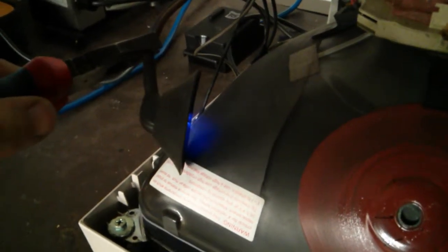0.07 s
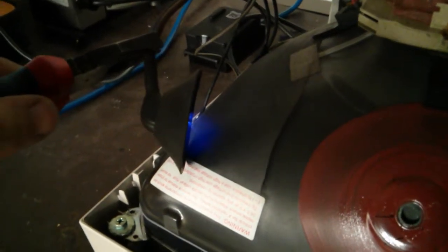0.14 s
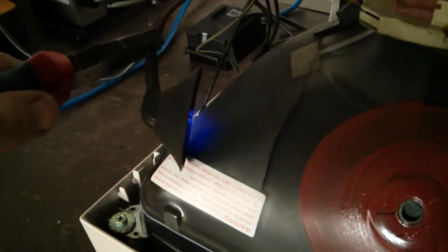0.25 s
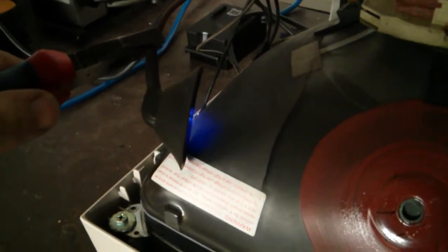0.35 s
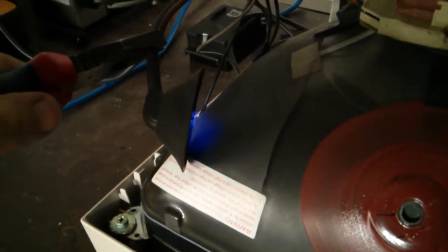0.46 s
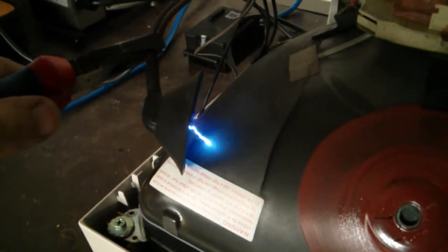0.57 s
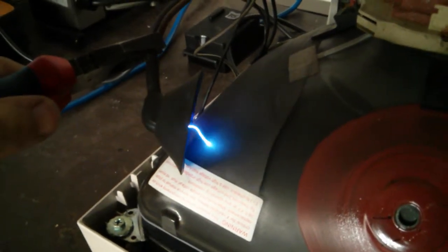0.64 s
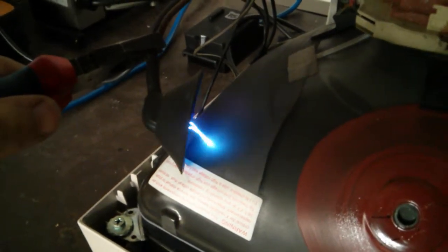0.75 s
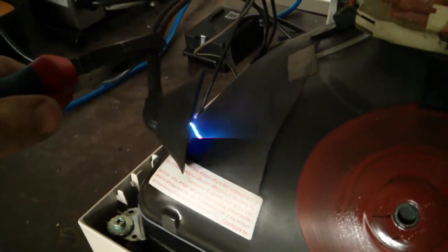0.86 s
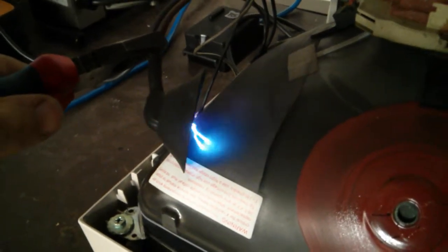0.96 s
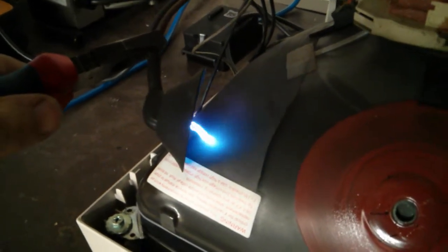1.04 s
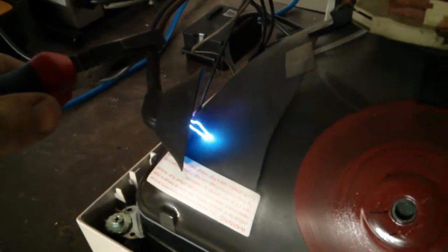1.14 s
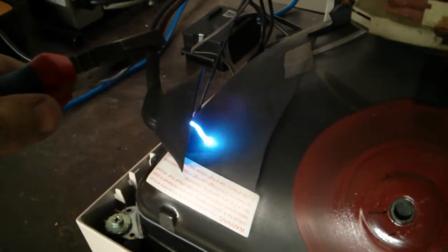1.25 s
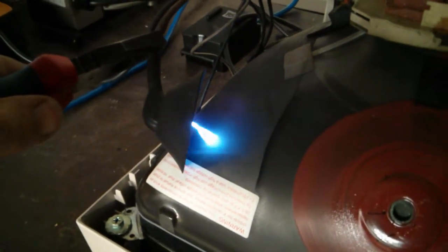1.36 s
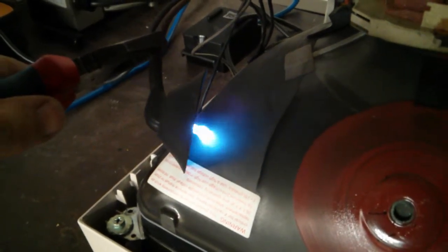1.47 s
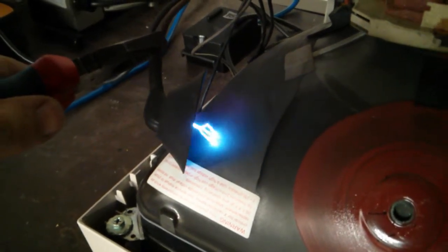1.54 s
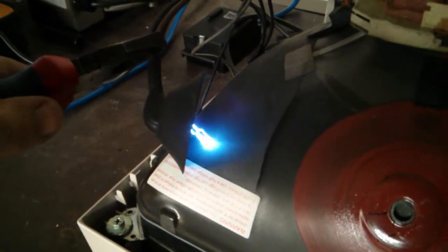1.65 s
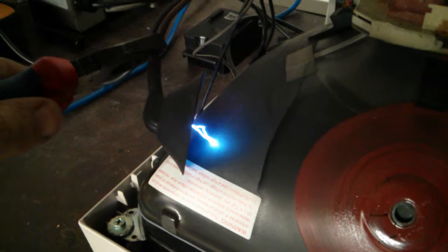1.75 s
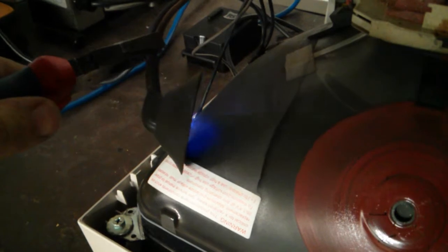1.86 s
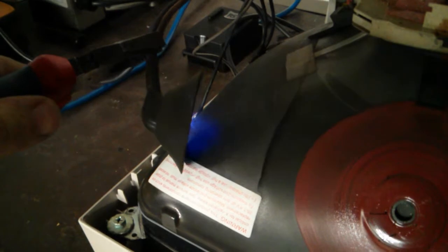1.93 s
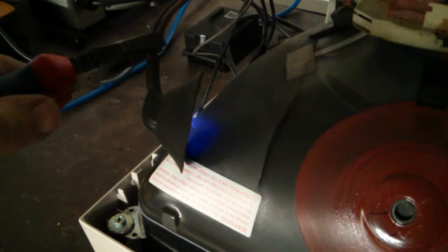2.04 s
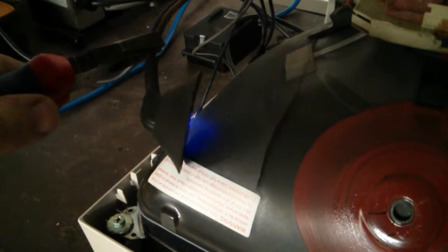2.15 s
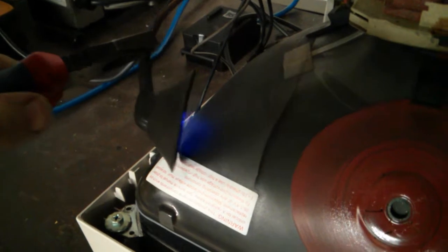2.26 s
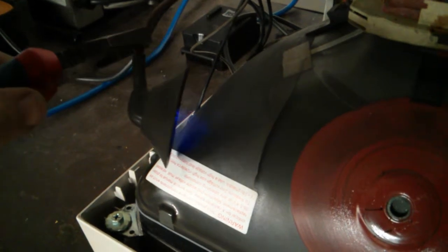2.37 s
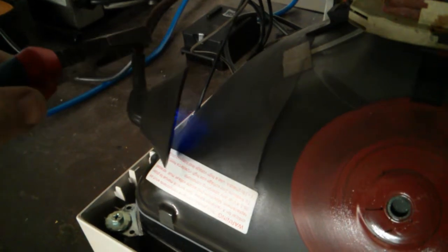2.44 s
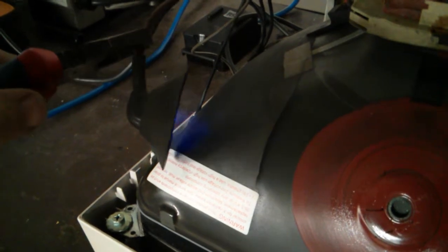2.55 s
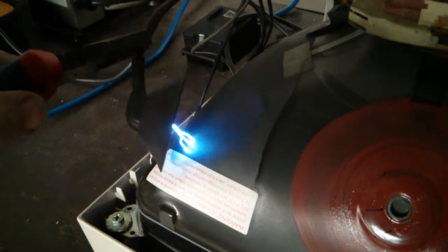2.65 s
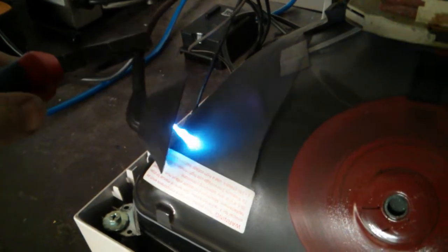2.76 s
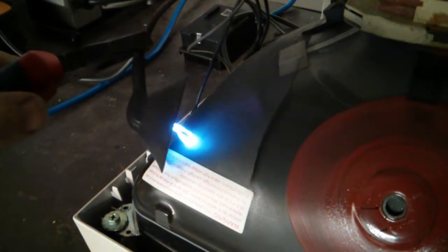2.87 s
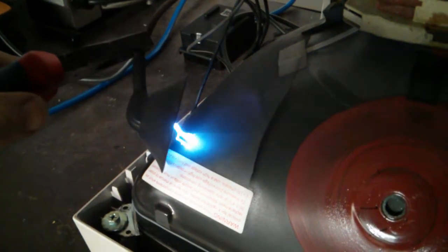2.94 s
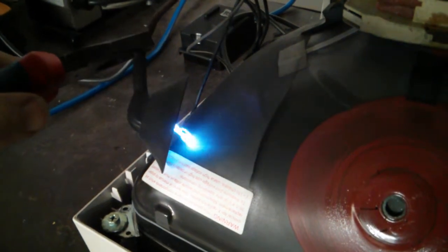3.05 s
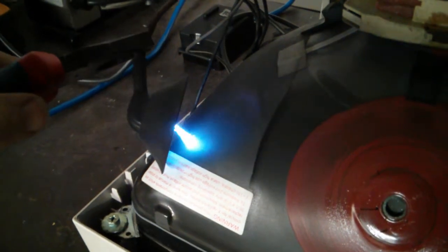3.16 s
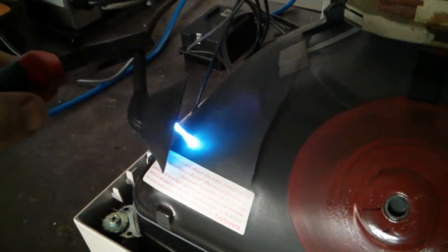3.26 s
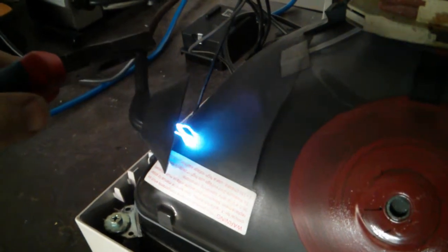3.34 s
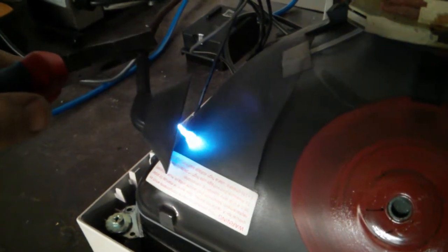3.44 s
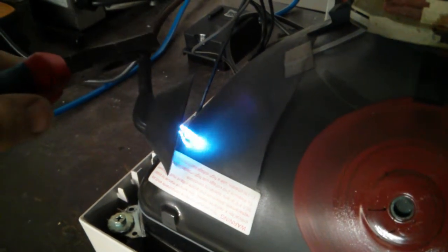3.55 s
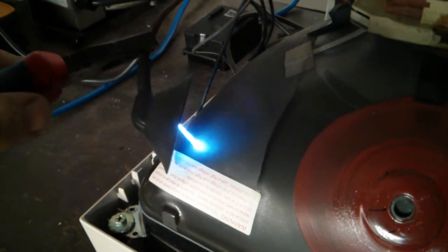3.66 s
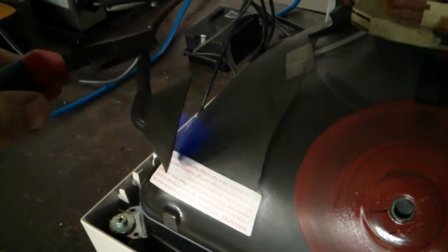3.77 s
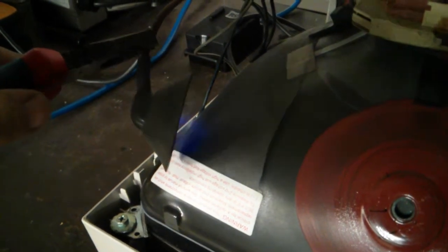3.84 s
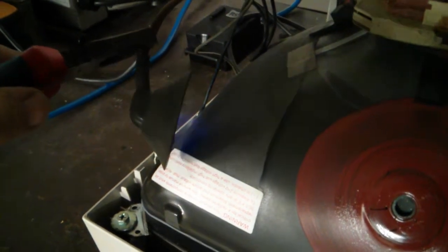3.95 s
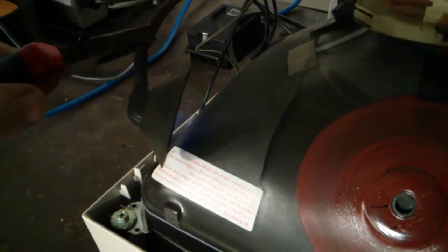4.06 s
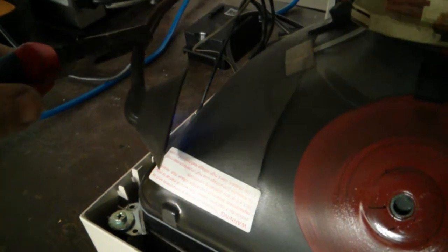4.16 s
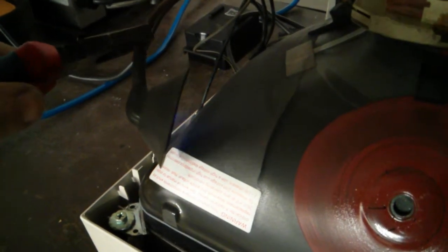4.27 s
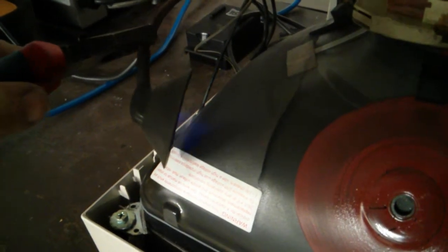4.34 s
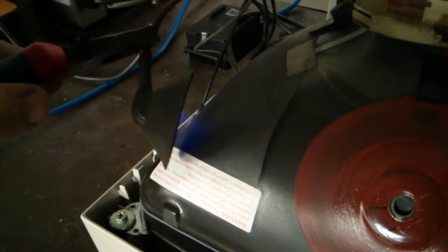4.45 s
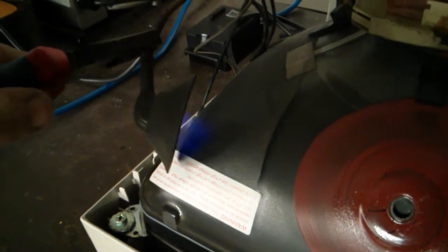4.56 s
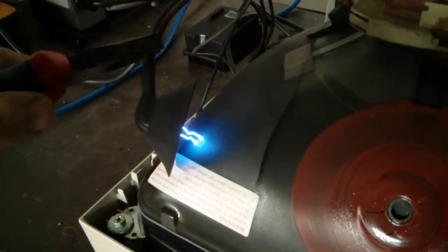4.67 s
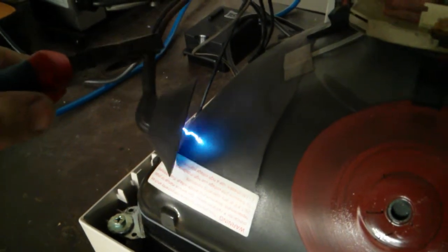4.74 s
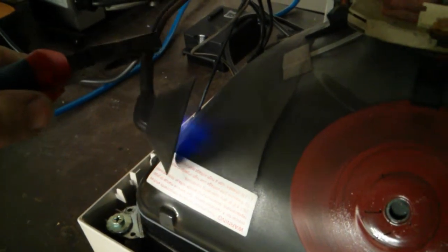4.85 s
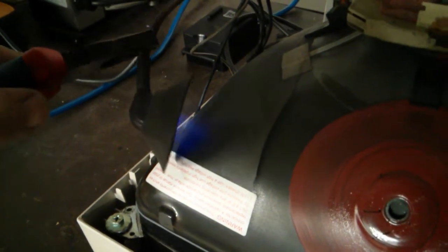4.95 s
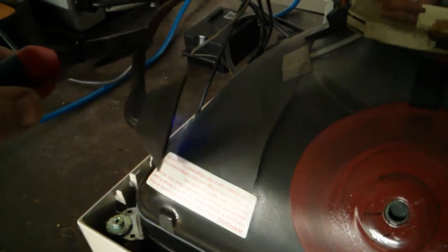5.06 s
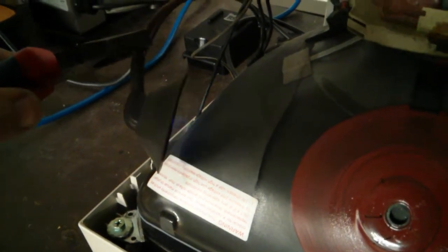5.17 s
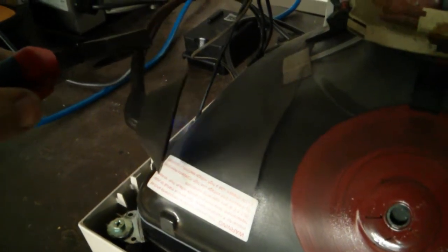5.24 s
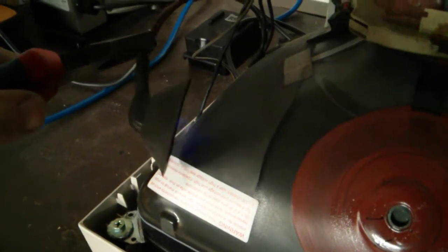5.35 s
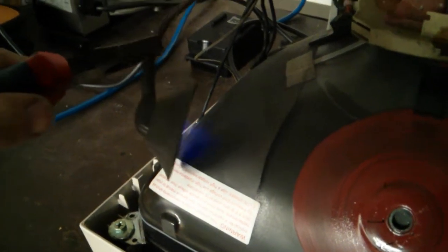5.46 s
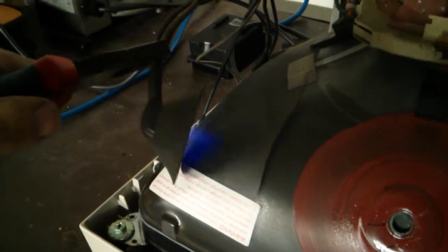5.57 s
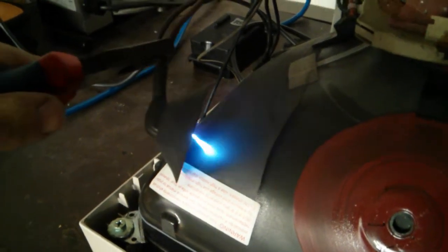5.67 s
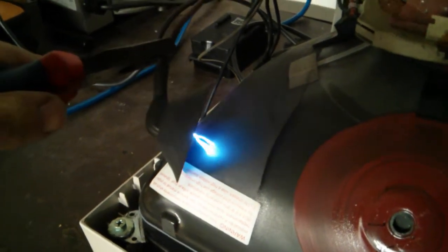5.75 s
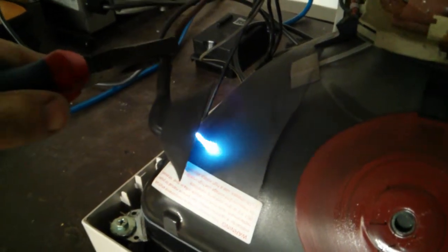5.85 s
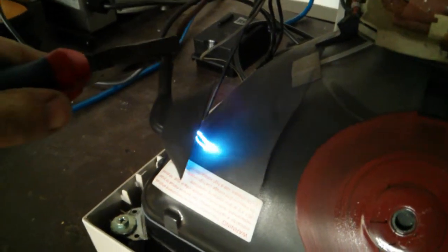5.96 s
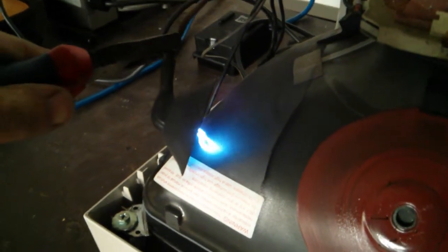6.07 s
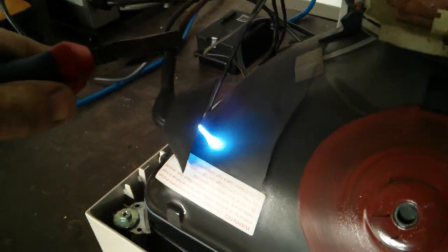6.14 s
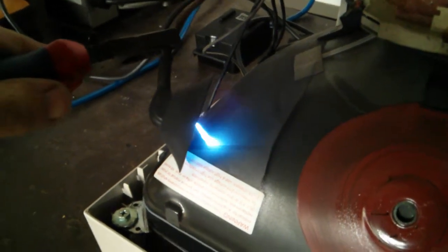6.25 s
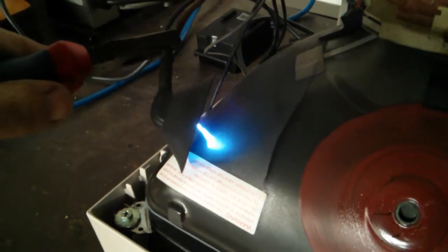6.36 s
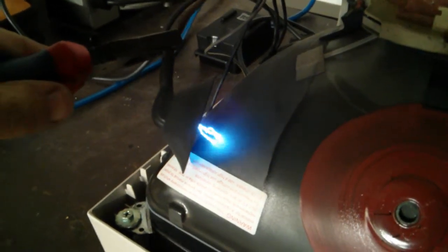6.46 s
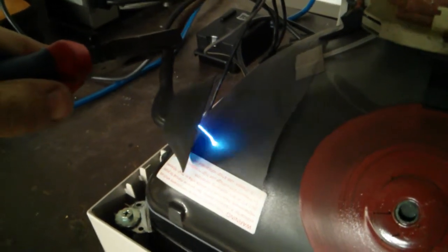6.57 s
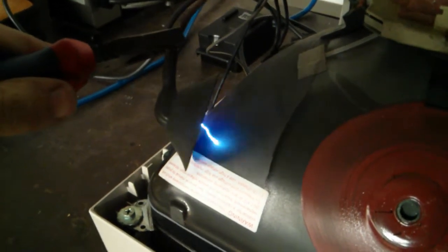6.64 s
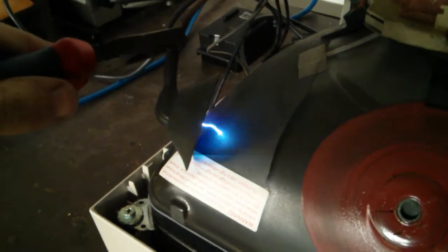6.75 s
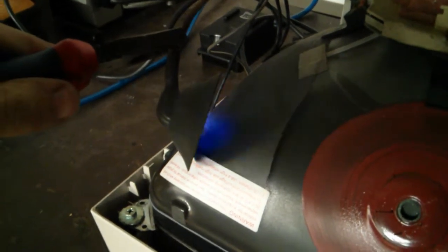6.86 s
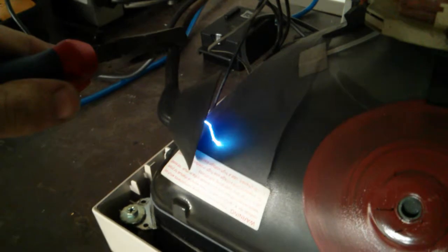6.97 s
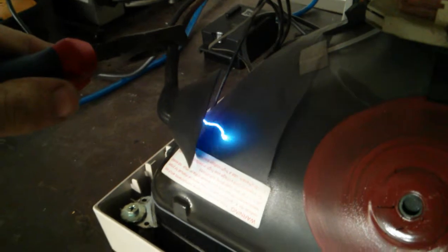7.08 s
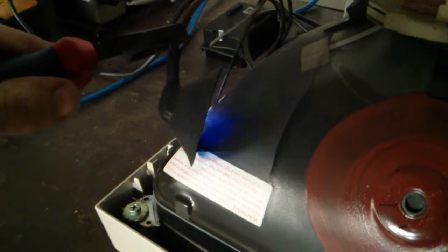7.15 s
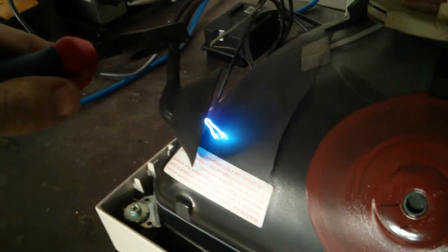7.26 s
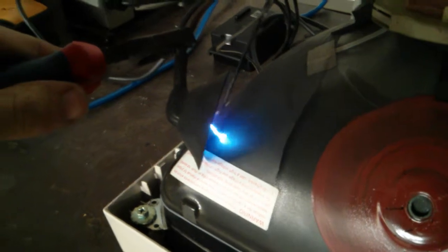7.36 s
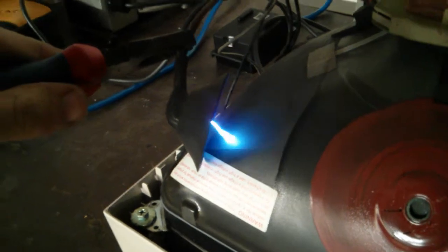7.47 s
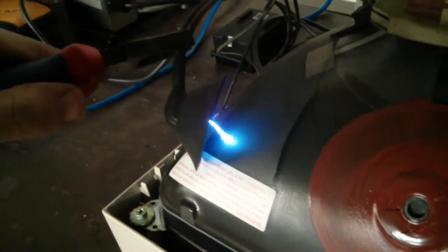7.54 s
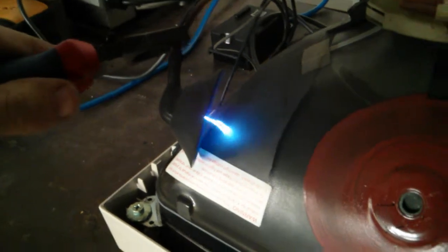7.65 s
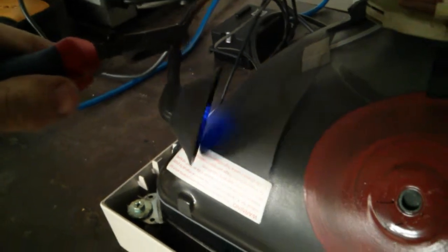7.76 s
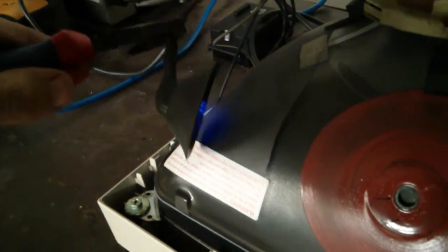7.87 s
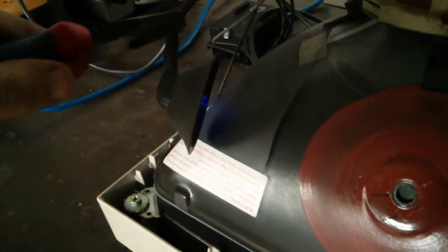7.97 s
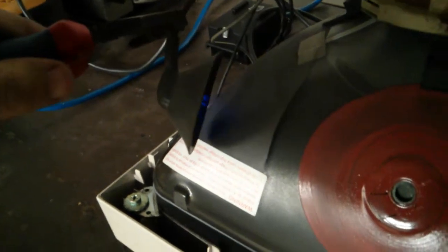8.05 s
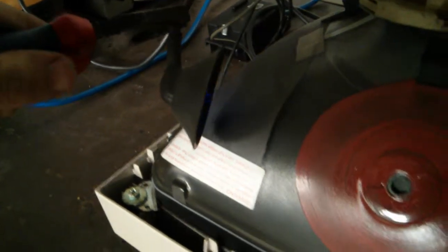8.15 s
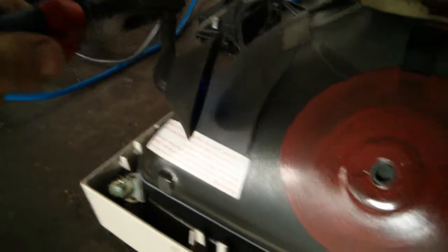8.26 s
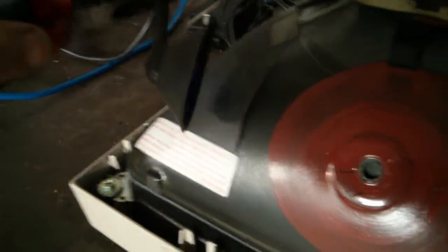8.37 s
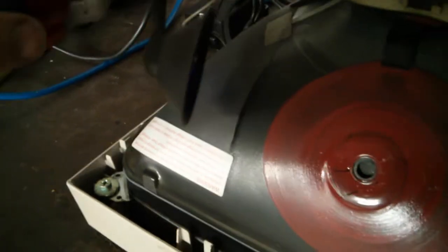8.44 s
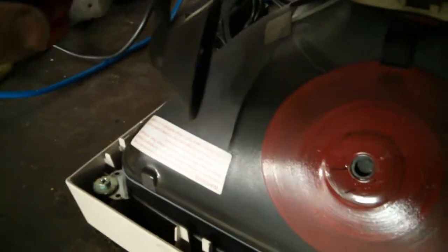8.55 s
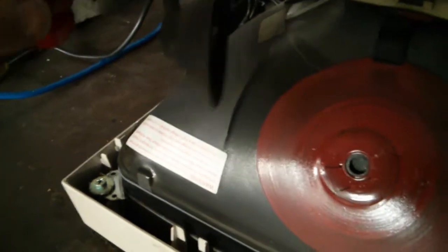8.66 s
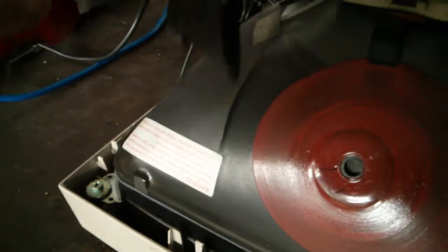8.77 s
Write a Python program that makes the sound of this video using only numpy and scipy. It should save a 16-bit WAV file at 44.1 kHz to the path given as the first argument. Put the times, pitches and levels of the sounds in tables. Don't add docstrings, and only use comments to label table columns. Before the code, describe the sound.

Bright electrical hiss with crackling, thumping dropouts alternates with a buzzy high corona tone, the arc dying and restriking until it fades to silence.

```python
import sys
import numpy as np
from scipy import signal
from scipy.fft import rfft, irfft, next_fast_len
from scipy.io import wavfile
from scipy.ndimage import uniform_filter1d, map_coordinates

SR = 44100
rng = np.random.default_rng(int(sys.argv[2]) if len(sys.argv) > 2 else 0)


def bounce(signal):
    frames = np.transpose(np.atleast_2d(signal))
    limited = np.clip(frames, -1, 1)
    pcm = np.round(limited * 32767).astype(np.int16)
    wavfile.write(sys.argv[1], SR, pcm)


def makeup_ratio(level_db):
    decades = np.asarray(level_db, float) / 20
    return 10 ** decades


N = 388521

# time_s, streamer_rate_hz, timing_scatter (0-1)
GAP = [(0, 3287, 0.24), (.55, 3184, 0.27), (.7, 2940, 0.15), (1.98, 3000, 0.14), (2.25, 2706, 0.18),
       (2.42, 2145, 0.13), (2.62, 2006, 0.19), (3.8, 2334, .12), (4.2, 1425, .28), (4.64, 2220, .08),
       (4.8, 2953, 0.14), (4.94, 2780, 0.06), (5.11, 1832, .2), (5.37, 1154, 0.32), (5.71, 2984, 0.07),
       (7.77, 2934, 0.08), (8.15, 1308, .3), (8.81, 1050, 0.28)]


def unit(x):
    return x / np.sqrt(np.mean(x ** 2) + 1e-20)


def along(points, hz):
    knots_hz, values = np.transpose(points)
    return np.interp(np.log(hz + 1), np.log(knots_hz + 1), values)


def curves(rows):
    knots_s, *columns = np.transpose(rows)
    t = np.arange(N) / SR
    return [np.interp(t, knots_s, column) for column in columns]


def wobble(rate_hz):
    return map_coordinates(rng.standard_normal(4000), [np.arange(N) * rate_hz / SR])


def filtered(x, response):
    size = next_fast_len(N + SR // 8)
    hz = np.fft.rfftfreq(size, 1 / SR)
    return irfft(rfft(x, size) * response(hz), size)[..., :N]


def noise(spectrum, patchy_db):
    bins = signal.stft(rng.standard_normal(N), nperseg=512)[2]
    field = uniform_filter1d(rng.standard_normal(bins.shape), size=5, axis=0)
    field = uniform_filter1d(field, size=8, axis=1)
    patchy = signal.istft(bins * makeup_ratio(patchy_db * unit(field)), nperseg=512)[1][:N]
    return unit(filtered(patchy, lambda hz: makeup_ratio(along(spectrum, hz))))


def clipped(x, top, hard):
    return x / (1 + np.abs(x / top) ** hard) ** (1 / hard)


def burning():
    # start_s, length_s, strength_db
    burns = [(0.635, .06, -5), (.84, .035, -1), (0.911, .07, -3), (1.048, .31, -1.5), (1.356, .63, -1),
             (2.69, 1.13, 2.5), (4.718, .025, -2), (4.756, .035, 2.5), (4.831, .045, -0.5),
             (5.755, .845, 1), (6.629, .035, 0.5), (6.686, .04, 3.5), (6.804, .03, -3.5),
             (6.871, .035, 0.5), (6.981, .075, 0), (7.089, .085, -1), (7.192, .025, -1), (7.332, .07, -1),
             (7.439, .325, -1.5), (7.797, .035, -3)]
    strike_s = .0124
    t = np.arange(N) / SR
    lit = []
    for start_s, length_s, _ in burns:
        inside_s = np.minimum(t - start_s, start_s + length_s - t)
        lit.append(np.clip(inside_s / strike_s + .5, 0, 1))
    lit = np.array(lit)
    return lit.max(0), np.array(burns)[lit.argmax(0), 2]


def discharge(lit, strength_db):
    # time_s, streamers_db, glow_db
    tip_field = [(0, -18, -14.5), (2.0, -17.5, -15), (2.35, -19, -16), (2.55, -23, -20), (3.82, -18.5, -6),
                 (3.96, -25, -26), (4.22, -38, -43), (4.45, -32.5, -21), (4.62, -20, -14.5),
                 (4.93, -19.5, -13), (5.1, -33, -21.5), (5.35, -48, -45), (5.55, -25, -16),
                 (5.73, -17.5, -13), (7.8, -16.5, -10.5), (8.2, -38, -29), (8.63, -64, -57.5),
                 (8.76, -89, -76)]
    # streamer_rate_hz, sputter_over_glow_db, wander_db
    idle_gap = [(1329.6, -29.5, -92), (1750, -39, -81.5), (2050, -35.5, -57), (2508, -28, -42.5),
                (3000, -20, -30.5)]
    streamers_db, glow_db = curves(tip_field)
    rate_hz = curves(GAP)[0]
    knots_hz, sputter_db, wander_db = np.transpose(idle_gap)
    idle_sputter_db = glow_db + np.interp(rate_hz, knots_hz, sputter_db)
    idle_wander_db = np.interp(rate_hz, knots_hz, wander_db)

    def level(idle_db, arc_db, db_per_db):
        return (1 - lit) * idle_db + lit * (arc_db + db_per_db * strength_db)

    return [level(streamers_db, -29.5, -2.6), level(glow_db, -10.5, .37),
            level(idle_sputter_db, -25, .74), level(idle_wander_db, -12.5, 2)]


def corona(level_db, struck):
    # freq_hz, density_db
    streamer = [(300, -37.5), (580, -42.5), (950, -11), (1080, -0.5), (1600, -0.5), (1950, 5.5),
                (3000, -1.5), (4300, 0.5), (4900, 4.5), (5700, 3), (6600, -5.5), (10500, -5), (11800, -28),
                (16000, 1)]
    rate_hz, scatter = curves(GAP)
    fluttering_hz = rate_hz * (1 + .62 * scatter * wobble(480))
    turns = np.cumsum(fluttering_hz) / SR
    chance = rng.standard_normal((30000, 2))
    nominal = np.interp(np.arange(len(chance)), turns, np.arange(N))
    uneven = scatter[nominal.astype(int)]
    steps = np.clip(1 + (.25 + 1.3 * uneven) * uneven * chance[:, 0], .2, None)
    at = np.interp(np.cumsum(steps), turns, np.arange(N), right=N + 20)
    taps = np.floor(at)[:, None] + np.arange(-7, 9)
    offset = taps - at[:, None]
    impulses = np.sinc(offset) * np.cos(np.pi * offset / 16) ** 2 * makeup_ratio(1.2 * chance[:, 1:])
    train = np.bincount(taps.astype(int).ravel() + 8, impulses.ravel())[8:N + 8]
    sparks = filtered(train / np.sqrt(rate_hz), lambda hz: makeup_ratio(along(streamer, hz)) * 1j)
    quench_db = struck * 5 * np.tanh(1.6 * wobble(36))
    return -makeup_ratio(level_db + 7.5 + .39 * wobble(28) + quench_db) * unit(sparks)


def tip_glow():
    # freq_hz, density_db
    near_glow = [(3000, -43.5), (4500, -4.5), (6000, -7), (6800, -9.5), (8500, 5), (10900, 1.5),
                 (11800, -3), (14000, -10), (15700, -5)]
    # freq_hz, density_db
    last_glow = [(1760, -46), (3000, -16), (4480, -16), (6960, 0.07), (7670, -11), (8620, -10), (9630, -17),
                 (14500, -10), (15600, -13)]
    # time_s, share (0-1)
    takeover = [
        (0, 0.15),
        (8.15, 0),
        (8.32, 0.88),
        (8.81, 0.76),
    ]
    away = np.clip(curves(takeover)[0], 0, 1)
    near = unit(shadowed(noise(near_glow, patchy_db=1.8)))
    return np.sqrt(1 - away) * near + np.sqrt(away) * noise(last_glow, patchy_db=4.0)


def arc(hiss_db, sputter_db, wander_db, struck):
    # freq_hz, density_db
    channel_hiss = [(2060, -58), (3500, -23), (5050, -11), (5650, -6), (6810, -7), (7480, -3.5),
                    (8800, -0.5), (11400, -5.5), (13300, -5), (15500, -13.5)]
    # freq_hz, density_db
    lumps = [(100, -5), (300, 0), (700, 2.5), (1500, 0), (2500, -4.5), (4500, -11.5), (8000, -45.5)]
    # freq_hz, density_db
    pressure_drift = [(10, -15.5), (30, 16), (60, -13), (120, -22.5), (250, -18.5), (500, -25.5),
                      (1000, -48.5)]
    flicker = wobble(45)
    colour = np.sqrt(struck) * noise(channel_hiss, patchy_db=1.3) + np.sqrt(1 - struck) * tip_glow()
    hiss = makeup_ratio(hiss_db + 1.0 + .33 * wobble(14) + .51 * flicker) * colour
    lumpy = makeup_ratio(.41 * flicker + 1.07 * wobble(150)) * noise(lumps, patchy_db=-1.0)
    sputter = makeup_ratio(sputter_db + 4.5) * unit(lumpy)
    jumps = (rng.random(N) < 70 / SR) * rng.standard_normal(N)
    t = np.arange(1024) / SR
    pop = (1 - np.exp(-(t / .0011) ** 2)) * np.exp(-t / .004)
    pops = signal.fftconvolve(jumps, pop)[:N]
    drift = unit(makeup_ratio(1.3 * flicker) * noise(pressure_drift, patchy_db=-2.5))
    wander = makeup_ratio(np.minimum(wander_db, hiss_db + 6) + 1.5) * (1.4 * drift + .4 * unit(pops))
    return hiss + sputter, clipped(wander, top=.33, hard=2.2)


def chance_surges(lit, count=40):
    least_push, push_spread = .56, .09
    when, side, more = rng.random((count, 3)).T
    burnt = np.cumsum(lit ** 2 + 1e-9)
    start_s = np.interp((np.arange(count) + when) / count, burnt / burnt[-1], np.arange(N) / SR)
    push = np.sign(side - .5) * (least_push - push_spread * np.log(1 - .9 * more))
    return zip(start_s, push)


def surges(lit):
    # start_s, push (microphone rails)
    single_surges = [(.634, .84), (.675, -.99), (.843, .75), (1.091, -1.04), (1.135, -.85), (1.427, -1.11),
                     (1.597, .92), (1.628, -1.09), (1.722, -.94), (1.777, 1.42), (1.874, 1.12),
                     (1.911, -.94), (2.692, 1.11), (2.758, -1.71), (2.987, 1.1), (3.05, 1.42),
                     (3.321, -1.08), (3.435, -.99), (3.685, -.99), (4.858, -1.63), (5.846, -1.14),
                     (5.985, -.92), (6.494, 1.27), (6.584, -.81), (6.711, .88), (6.888, -.99), (7.36, .82),
                     (7.413, 1.02), (7.49, .92), (7.802, -.92)]
    # start_s, push (rails), delay_ms, second_push (rails)
    double_surges = [(.909, .56, 12, -.95), (1.054, .88, 17, -.86), (1.195, .99, 15, -.98),
                     (1.386, 1.04, 16, 1.42), (2.909, .95, 18, -1.23), (3.023, .82, 8, -.92),
                     (3.249, .88, 9, -1.05), (4.761, -.63, 12, .81), (5.783, -1, 11, 1.26),
                     (6.027, 1.26, 8, -1.16), (6.14, 2.29, 10, -2.31), (6.189, 1.5, 12, -1.34),
                     (6.334, 2.28, 11, -.78), (6.37, 2.07, 11, -.87), (6.459, 1.5, 12, -2.25),
                     (6.526, 1.13, 14, 1.24), (7.088, 1.75, 16, -2.3), (7.687, .99, 12, -1.02)]
    rise_s, fall_s, longest_hold_s, hold_push = .001, .0022, .009, .72
    pushes = [*single_surges, *chance_surges(lit)]
    for start_s, first, delay_ms, second in double_surges:
        second_s = start_s + delay_ms / 1000
        pushes += [(start_s, first), (second_s, second)]
        if first > 1.45:
            pushes.append((second_s + .012, -.68))
    t = np.arange(2048) / SR
    membrane = np.zeros(N + 2048)
    for start_s, size in pushes:
        hold_s = longest_hold_s * (1 - np.exp(-abs(size) / hold_push))
        held = (1 - np.exp(-(t / rise_s) ** 2)) / (1 + np.exp((t - hold_s - .0012) / fall_s))
        membrane[round(start_s * SR):][:len(t)] += .96 * size * held
    return membrane[:N]


def shadowed(x):
    # centre_hz, width_hz, depth (0-1)
    notches = [(2467, 226, 1), (4576, 350, 1), (5810, 600, 0.6), (7170, 640, 0.1), (8200, 240, 0.5),
               (9160, 340, 0.7), (9900, 180, 0.3), (13800, 360, 0)]

    def response(hz):
        total = 1
        for centre_hz, width_hz, depth in notches:
            loss = 1j * hz * width_hz
            total = total * (1 - np.clip(depth, 0, 1) * loss / (centre_hz ** 2 - hz ** 2 + loss))
        return total

    return filtered(x, response)


def workshop(x, level_db=-9, t60_s=.16):
    t = np.arange(SR // 10) / SR
    tail = rng.standard_normal(len(t)) * makeup_ratio(-60 * t / t60_s) * (t > .001)
    scattered = signal.fftconvolve(x, tail / np.linalg.norm(tail))[:N]
    return (x + makeup_ratio(level_db) * scattered) / np.sqrt(1 + makeup_ratio(2 * level_db))


def bumps():
    # start_s, level_db
    hand_bumps = [
        (8.7983, -43),
        (8.8042, -35),
    ]
    # freq_hz, level_db, t60_s
    shell_modes = [(160, 6, 0.028), (620, 3, 0.027), (1300, -5, .04), (4160, -23, 0.027)]
    t = np.arange(N) / SR
    ringing = np.zeros(N)
    for start_s, bump_db in hand_bumps:
        since_s = np.clip(t - start_s, 0, 1)
        for mode_hz, mode_db, t60_s in shell_modes:
            decay = makeup_ratio(bump_db + mode_db - 60 * since_s / t60_s)
            ringing += decay * np.sin(2 * np.pi * mode_hz * since_s)
    return ringing


def noise_floor():
    # freq_hz, density_db
    floor_spectrum = [(30, -16), (130, -40), (480, -51), (650, -14.5), (2040, 15), (2870, -34.5),
                      (7780, -10), (15800, -45)]
    return makeup_ratio(-97) * noise(floor_spectrum, patchy_db=-2.0)


def scene():
    lit, strength_db = burning()
    corona_db, hiss_db, sputter_db, wander_db = discharge(lit, strength_db)
    push = surges(lit)
    stir_s, stir_db = .05, 6
    stir = np.tanh(3 * uniform_filter1d(np.abs(push), size=round(stir_s * SR)))
    struck = 1 / (1 + np.exp(-(sputter_db - hiss_db + 17.5) / 1.75))
    fizz, wander = arc(hiss_db, sputter_db, wander_db + stir_db * stir, struck)
    air = workshop(shadowed(corona(corona_db, struck)) + fizz)
    return np.tile(air + wander + push + bumps() + noise_floor(), (2, 1))


def bass_cut(hz):
    cut_hz, damping = 95, .95
    return -hz ** 2 / (cut_hz ** 2 - hz ** 2 + 1j * damping * hz * cut_hz)


def echo_and_band(hz):
    # freq_hz, level_db
    echo_strength = [(500, -61.5), (1900, -20), (2450, -6), (3550, 2.5), (3900, 14), (4300, -15),
                     (5500, -17), (16000, -38)]
    echo_s, top_hz = .003, 15740
    echo = makeup_ratio(along(echo_strength, hz))
    comb = (1 + echo * np.exp(-2j * np.pi * hz * echo_s)) / np.sqrt(1 + echo ** 2)
    return comb * makeup_ratio(-60 * np.clip((hz - top_hz) / 120, 0, 2))


def roll_off(x):
    return signal.sosfilt(signal.butter(12, 17070, fs=SR, output="sos"), x)


def record(dry):
    stage = filtered(clipped(dry[0], top=.66, hard=7.5), bass_cut)
    converted = clipped(stage, top=.71, hard=26)
    mix = np.tile(filtered(converted, echo_and_band), (2, 1))
    return roll_off(mix)


dry = scene()
out = record(dry)
bounce(out)
```